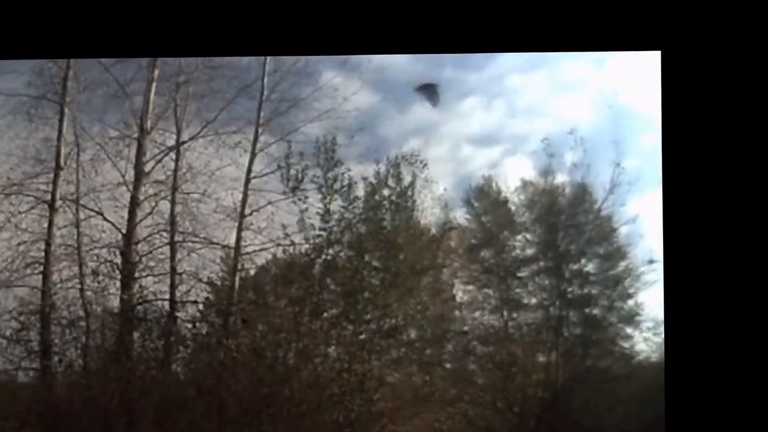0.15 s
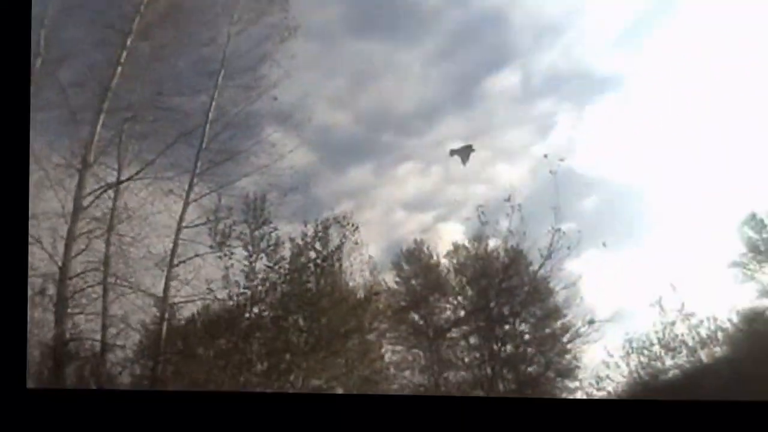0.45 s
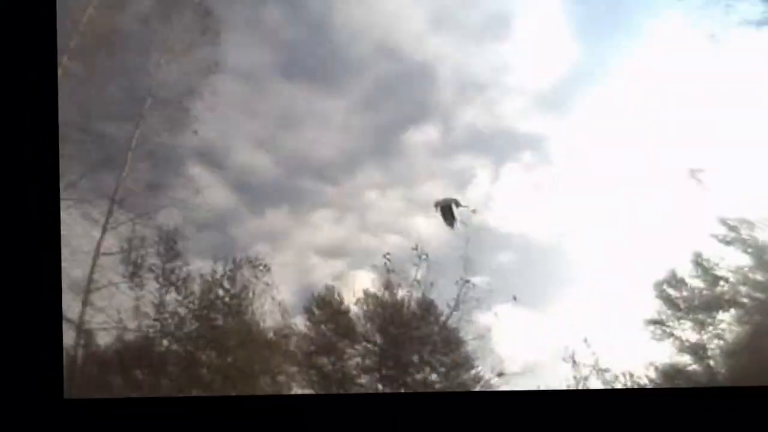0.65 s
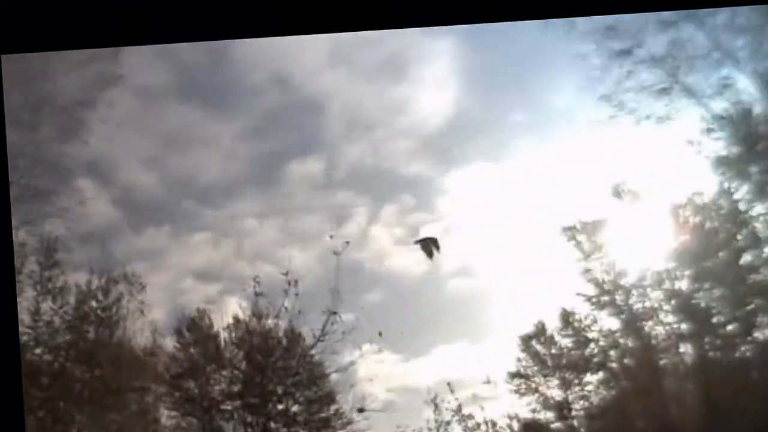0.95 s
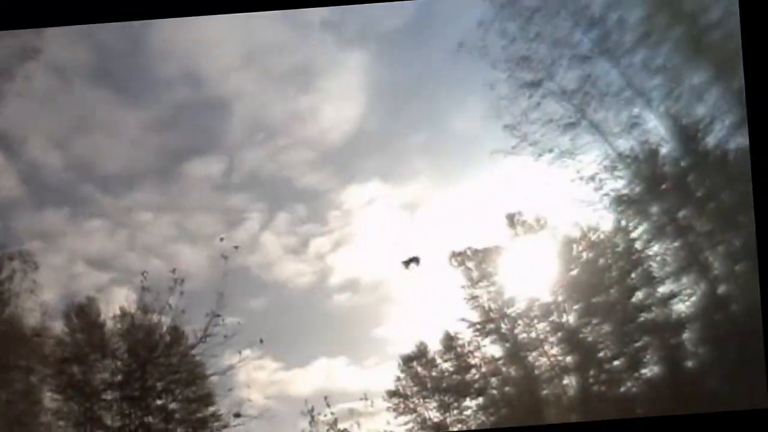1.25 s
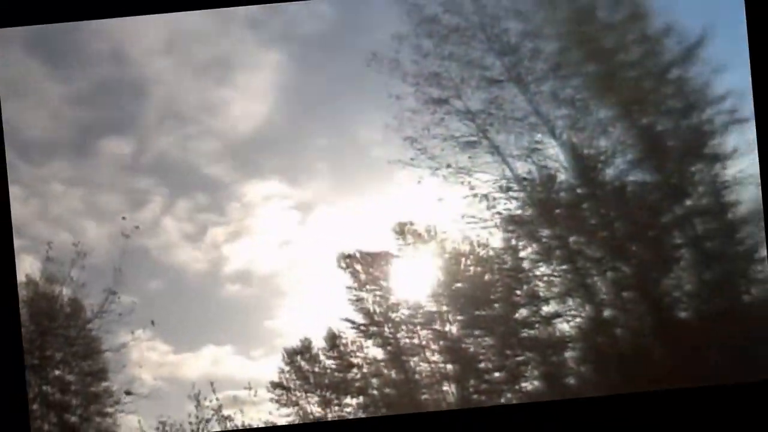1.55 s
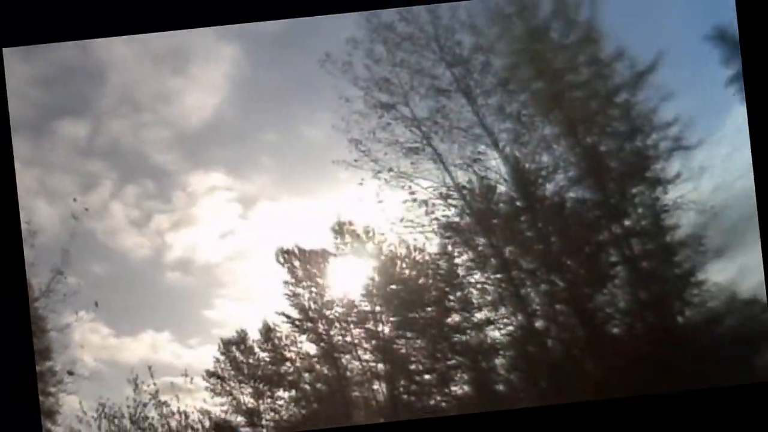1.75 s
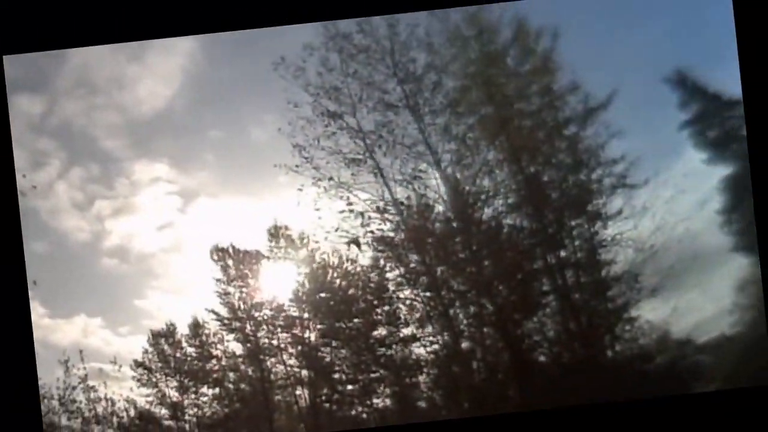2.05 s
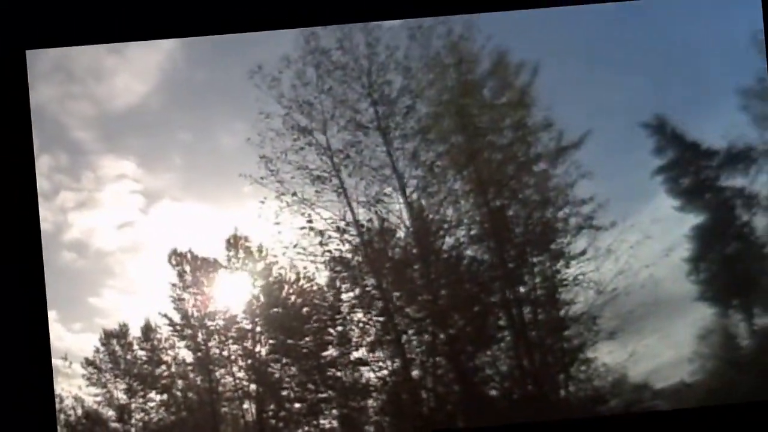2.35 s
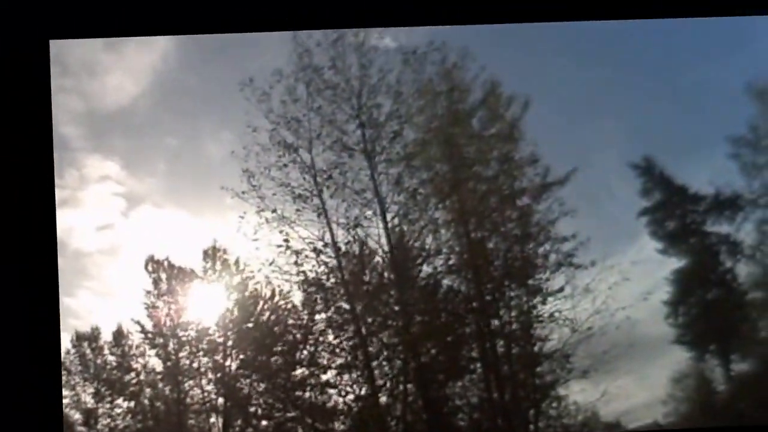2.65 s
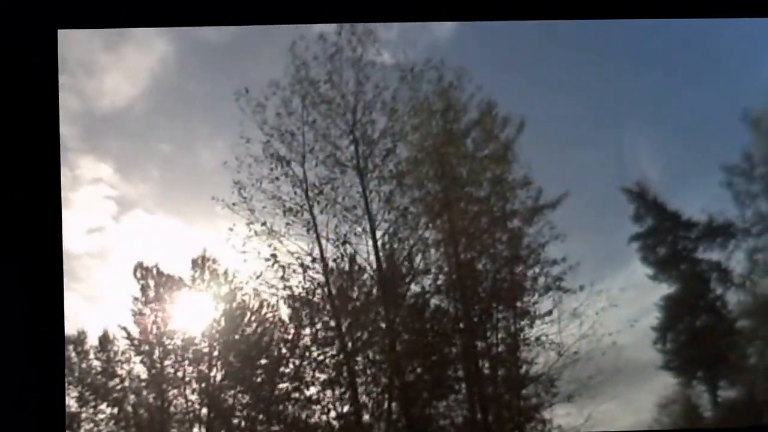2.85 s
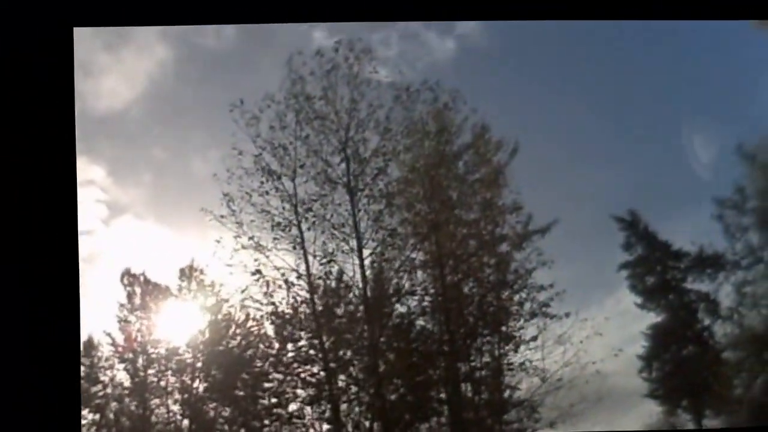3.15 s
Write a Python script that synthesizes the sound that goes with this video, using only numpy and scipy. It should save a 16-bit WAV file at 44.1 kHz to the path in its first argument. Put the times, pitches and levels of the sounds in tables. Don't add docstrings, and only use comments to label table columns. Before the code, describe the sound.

Small high-pitched pellet bells jingle densely and close from the start until about 0.8 s, then in sparser, weaker bursts, sinking slightly in pitch and fading to faint tinkles by 3.3 s as the bird flies off. Cloth rustles, plastic ticks and knocks cluster before 1.6 s; wind buffets low around 0.85 s. Distant traffic drones throughout; one soft falling hoot at 1.45 s; a dull thud at 2.1 s.

```python
import sys
import numpy as np
from scipy import signal
from scipy.fft import rfft, irfft
from scipy.io import wavfile
from scipy.ndimage import uniform_filter1d

SR = 44100
rng = np.random.default_rng(int(sys.argv[2]) if len(sys.argv) > 2 else 0)


def to_wav(s):
    ch = np.atleast_2d(s).T
    pcm = np.round(np.clip(ch, -1, 1) * 32767)
    wavfile.write(sys.argv[1], SR, pcm.astype(np.int16))


def volts_from_db(level):
    exponent = np.asarray(level, float) / 20
    return 10 ** exponent


N = 145971


def evened(x):
    return x / np.sqrt(np.mean(x ** 2) + 1e-20)


def read(points, hz):
    f, value = np.transpose(points)
    return np.interp(np.log(hz + 1), np.log(f + 1), value)


def along(points):
    return np.interp(np.arange(N) / SR, *np.transpose(points))


def add(mix, s, sound):
    part = mix[round(s * SR):][:len(sound)]
    part += sound[:len(part)]


def colour(x, spectrum, below_db=0):
    hz = np.fft.rfftfreq(len(x), 1 / SR)
    gain_db = read(spectrum, hz) + below_db * (hz < spectrum[0][0])
    return irfft(rfft(x) * volts_from_db(gain_db), len(x))


# (frequency [Hz], density [dB per Hz])
HISS_SPECTRUM = [(1500, -0.5), (3000, -3), (5000, -7.5), (6600, -11.5), (7900, -6.5), (8600, -8.5)]


def hiss():
    hiss_db = -71
    return volts_from_db(hiss_db) * evened(colour(rng.standard_normal(N), HISS_SPECTRUM, below_db=-20.5))


# (frequency [Hz], density [dB per Hz])
ROAD_SPECTRUM = [(60, -2.5), (93, -1.5), (330, -30), (951, -18), (1770, -32.5), (3000, -42), (4400, -50.5),
                 (8600, -71)]
# (time [s], level [dB])
CARS_PASSING = [
    (0, -0.56),
    (1.1, 0.75),
    (1.9, -0.74),
    (2.6, 1),
    (2.9, -0.55),
    (3.31, 2.5),
]
# (frequency [Hz], width [Hz], level [dB])
ENGINE_DRONES = [
    (90.6, 21.5, -38),
    (126.8, 32, -48),
    (205.8, 74, -52),
]


def traffic():
    road_db, patch_db, swell_db = -34, 0.54, 0.18
    frames, bins = N // 256 + 5, 513
    patches = uniform_filter1d(rng.standard_normal((frames, bins)), size=14, axis=0)
    patches = evened(uniform_filter1d(patches, size=10, axis=1))
    swell = evened(uniform_filter1d(rng.standard_normal(frames), size=40))[:, None]
    noise = rng.standard_normal((frames, bins)) + 1j * rng.standard_normal((frames, bins))
    noise = noise * volts_from_db(patch_db * patches + swell_db * swell)
    wash = signal.istft(noise.T, nperseg=1024, noverlap=768)[1][:N]
    out = volts_from_db(road_db + along(CARS_PASSING)) * evened(colour(wash, ROAD_SPECTRUM, below_db=-13))

    f = np.fft.rfftfreq(N, 1 / SR)
    for drone_hz, width_hz, db in ENGINE_DRONES:
        resonance = 1 / (1 + (2 * (f - drone_hz) / width_hz) ** 2)
        out += volts_from_db(db) * evened(irfft(rfft(rng.standard_normal(N)) * resonance, N))
    return out


# (start [s], length [s], from [Hz], to [Hz], level [dB])
FAR_HOOT = (1.44, .18, 612, 505, -47)


def hoot():
    s, length, from_hz, to_hz, db = FAR_HOOT
    out, u = np.zeros(N), np.linspace(0, 1, round(length * SR))
    tone = np.sin(2 * np.pi * np.cumsum(from_hz + (to_hz - from_hz) * u) / SR)
    add(out, s, np.sqrt(2) * volts_from_db(db) * np.sin(np.pi * u) ** .4 * tone)
    return out


# (time [s], level [dB])
GUST_LEVEL = [(0, -26), (.3, -35.5), (.6, -33.5), (.76, -25), (.86, -21.5), (1, -26.5), (1.1, -38.5),
              (1.5, -32.5), (1.8, -35), (2, -34), (2.6, -36), (3.31, -39)]
# (frequency [Hz], density [dB per Hz])
WIND_SPECTRUM = [(2.4, -37.5), (4.0, 2), (16, 7), (54, 0), (90, -12), (120, -27), (200, -120)]


def wind():
    spectrum = WIND_SPECTRUM + [(200, -33.5), (400, -83.0)]
    return volts_from_db(along(GUST_LEVEL)) * evened(colour(rng.standard_normal(N), spectrum))


# (time [s], level [dB])
HAND_MOVEMENT = [(0, -53.5), (.17, -64), (.21, -52.5), (.3, -53), (.345, -45), (.46, -49), (.57, -54.5),
                 (.66, -53), (.69, -47), (.73, -51), (.86, -57), (1.07, -56.5), (1.15, -49), (1.29, -52),
                 (1.37, -56.5), (1.44, -53), (1.53, -54.5), (1.6, -64)]
# (frequency [Hz], density [dB per Hz])
CLOTH_SPECTRUM = [(880, -35), (1500, -12.5), (1910, -12), (2670, -5.5), (3400, -6.5), (4690, -10.5),
                  (8050, -4.5), (8600, -4), (11200, -32), (18900, -120)]


def rustle():
    cloth_db, snaps_per_s, spread_db, smooth = 3, 2200, 12, 0.67
    snaps = volts_from_db(spread_db * np.minimum(rng.exponential(1, N), 3.5)) * (rng.random(N) < snaps_per_s / SR)
    grain = rng.standard_normal(60) * np.exp(-np.arange(60) / 12)
    snaps = signal.oaconvolve(snaps, grain)[:N]
    rub = smooth * rng.standard_normal(N) + (1 - smooth) * evened(snaps)
    rub = colour(rub, [(700, -38.0)] + CLOTH_SPECTRUM, below_db=-25.0)
    return volts_from_db(along(HAND_MOVEMENT) + cloth_db) * evened(rub)


# (time [s], peak level [dB], pitch [Hz])
CASING_TICKS = [(.065, -42, 5200), (.318, -36, 6900), (0.341, -27, 7150), (0.342, -34, 3000),
                (.348, -43, 4100), (.37, -45, 4300), (.463, -35.5, 4300), (.633, -33, 7600),
                (.686, -34.5, 5900), (.702, -47, 4700), (1.16, -32, 6300), (1.208, -48, 5200),
                (1.417, -41, 6400), (1.46, -46, 4100), (1.703, -49, 6800), (1.713, -51, 4600),
                (1.744, -56, 4800), (1.908, -45, 6800), (1.993, -53, 6000), (2.103, -42.5, 4830),
                (2.454, -50, 7250), (2.462, -50, 5850), (3.115, -45, 7900)]


def ticks():
    tick_db, t60_s, width_octaves = 5, .006, .5
    out, t, f = np.zeros(N), np.arange(1024) / SR, np.fft.rfftfreq(1024, 1 / SR) + 1
    for s, db, hz in CASING_TICKS:
        band = np.exp(-.5 * (np.log2(f / hz) / width_octaves) ** 2)
        body = evened(irfft(rfft(rng.standard_normal(len(t))) * band))
        add(out, s, np.minimum(t * 1000, 1) * volts_from_db(db + tick_db - 60 * t / t60_s) * body)
    return out


# (time [s], peak level [dB], pitch [Hz])
CASING_KNOCKS = [
    (0.296, -36.5, 1900),
    (0.631, -30.5, 2870),
    (0.63, -28, 1100),
    (2.103, -33.5, 300),
    (3.161, -37, 930),
]


def knocks():
    t60_s = .017
    out, t = np.zeros(N), np.arange(0, .06, 1 / SR)
    for s, db, hz in CASING_KNOCKS:
        fall_db = -60 * t * np.sqrt(hz / 1000) / t60_s
        add(out, s, volts_from_db(db + fall_db) * np.sin(2 * np.pi * hz * t))
    return out


# (time [s], loose-pellet level [dB], Doppler ratio)
FLIGHT_PATH = [
    (0, -54, 1),
    (.3, -54, 1),
    (.7, -59, .997),
    (.9, -70, .992),
    (1.2, -63, .989),
    (1.7, -66, .987),
    (2.2, -69, .985),
    (3.31, -70, .988),
]
# (frequency [Hz], level [dB], T60 [s])
SHELL_MODES = [
    (3060, -9, .04),
    (3430, -5, .07),
    (3490, -5, .07),
    (7290, -9, .1),
    (7520, -10, .08),
    (7830, -9, .08),
    (8150, -8, .08),
    (8460, -14, .05),
]


def roll():
    taps_per_s, spread_db = 260, 2.8
    s, roll_db, ratio = np.transpose(FLIGHT_PATH)
    turns, out = np.cumsum(along(np.transpose([s, ratio]))) / SR, np.zeros(N)
    for hz, db, t60 in SHELL_MODES:
        taps = volts_from_db(spread_db * np.minimum(rng.exponential(1, N), 4)) * (rng.random(N) < taps_per_s / SR)
        taps = taps * np.exp(2j * np.pi * rng.random(N))
        ring = signal.lfilter([1], [1, -np.exp(-np.log(1000) / (t60 * SR))], taps)
        out += volts_from_db(db) * evened((ring * np.exp(2j * np.pi * hz * turns)).real)
    return volts_from_db(along(np.transpose([s, roll_db]))) * out


def struck(strikes):
    s, _, ratio = np.transpose(FLIGHT_PATH)
    out = []
    for at, db, hz, ring in strikes:
        modes = np.array(SHELL_MODES)[:, 0] * np.interp(at, s, ratio)
        out.append((at, db, modes[np.argmin(abs(modes - hz))], ring))
    return out


def rings(strikes, t60, gain_db, waver_hz):
    rise_s, twin_ratio, twin_db, stop_db_per_s = .0013, 1.017, -13, -2000
    bounce_db, bounce_hz = 2, 110
    out, t = np.zeros(N), np.arange(0, .15, 1 / SR)
    b, a = signal.butter(2, bounce_hz + 2 * waver_hz, fs=SR)
    ruffle = evened(signal.lfilter(b, a, rng.standard_normal((len(strikes), 2, len(t)))))
    for (s, db, hz, length), (bounce, waver) in zip(strikes, ruffle):
        phase, twin_phase, side = rng.random(3)
        twin = twin_ratio if side < .5 else 1 / twin_ratio
        turns = np.cumsum(hz + waver_hz * waver) / SR
        tone = np.sin(2 * np.pi * (turns + phase))
        tone += volts_from_db(twin_db) * np.sin(2 * np.pi * (twin * turns + twin_phase))
        fall_db = -60 * t / t60 + stop_db_per_s * np.maximum(t - length, 0) + bounce_db * bounce
        add(out, s, np.minimum(t / rise_s, 1) * volts_from_db(db + gain_db + fall_db) * tone)
    return out


# (time [s], peak level [dB], pitch heard [Hz], ring [s])
NEAR_STRIKES = [(.003, -44, 3420, 0.038), (.036, -41, 3430, 0.029), (.064, -38, 3430, .028),
                (.097, -39, 3490, 0.046), (.152, -42, 3430, 0.021), (.168, -39.5, 3430, .03),
                (.204, -44, 3490, .03), (.243, -35, 3430, 0.018), (.268, -37, 3490, 0.021),
                (.287, -43, 3500, 0.021), (.361, -40, 3490, .012), (.372, -38.5, 3490, 0.018),
                (.394, -45, 3480, .015), (.425, -44, 3480, .03), (.47, -50, 3490, 0.037),
                (.522, -41.5, 3490, 0.024), (.568, -44.5, 3480, 0.033), (.604, -54.5, 3480, 0.014),
                (.696, -49, 3430, 0.028), (.729, -53.5, 3420, 0.026), (.786, -44, 3480, 0.028),
                (1.057, -43, 3440, 0.021), (1.074, -46, 3380, .015), (1.094, -45, 3430, 0.013),
                (1.142, -48, 3380, .015), (1.162, -54, 3380, 0.036), (1.299, -51, 3470, .01),
                (1.321, -46, 3430, .015), (1.341, -46, 3430, 0.026), (1.422, -49.5, 3380, .03)]
# (time [s], peak level [dB], pitch heard [Hz], ring [s])
FAR_STRIKES = [(1.561, -46, 3390, 0.018), (1.583, -45.5, 3390, 0.021), (1.78, -50, 3380, .025),
               (1.822, -53.5, 3370, .012), (1.85, -47.5, 3400, .025), (1.874, -47.5, 3400, 0.013),
               (1.892, -47, 3370, 0.022), (1.973, -53.5, 3350, 0.036), (2.073, -51.5, 3330, 0.022),
               (2.091, -48.5, 3370, .03), (2.138, -52, 3380, .035), (2.262, -55.5, 3380, 0.031),
               (2.35, -47.5, 3380, 0.026), (2.39, -55.5, 3380, .022), (2.636, -47.5, 3380, 0.023),
               (2.672, -52, 3380, 0.0077), (2.723, -57, 3380, .04), (2.805, -59, 3390, .02),
               (2.976, -55.5, 3440, 0.017), (3.126, -59, 3440, .03), (3.249, -50.5, 3370, .04),
               (3.28, -54, 3480, .03)]
# (time [s], peak level [dB], pitch heard [Hz], ring [s])
GLANCING_STRIKES = [(.001, -41.5, 7400, .012), (.004, -42.5, 7830, 0.024), (.064, -42.5, 8150, 0.018),
                    (.067, -52, 7290, .045), (.096, -41, 8150, 0.014), (.12, -51, 7520, .03),
                    (.149, -45, 7520, .012), (.167, -49, 7290, .035), (.217, -43, 8150, .025),
                    (.225, -46.5, 8450, 0.048), (.242, -41, 8150, .02), (.267, -40, 8150, .03),
                    (.369, -45.5, 7820, 0.0088), (.404, -40, 7830, 0.016), (.521, -45.5, 7510, 0.021),
                    (.544, -41.5, 7520, 0.018), (.686, -41.5, 8120, .012), (.787, -36.5, 8120, 0.021),
                    (.786, -46.5, 7340, 0.022), (1.077, -48, 7220, .015), (1.098, -47.5, 7200, .04),
                    (1.323, -43, 7210, .012), (1.545, -52, 8050, .024), (1.591, -44, 7740, 0.01),
                    (1.807, -55.5, 7720, .02), (1.827, -52, 7720, .022), (1.849, -56, 7750, .022),
                    (2.135, -61, 7720, .022), (2.677, -59, 7210, .035), (2.722, -52, 7310, .008),
                    (2.74, -60, 7210, .025), (2.983, -55, 8050, 0.02), (3.266, -60, 7740, .02)]
# (time [s], peak level [dB], pitch [Hz], ring [s])
HOLLOW_BLOWS = [(.001, -37, 3040, .01), (.018, -43, 2930, .012), (.034, -36, 3150, .01),
                (.072, -46, 3150, .015), (.242, -41, 3260, .01), (.266, -41, 3200, .008),
                (.463, -39, 3150, 0.0051), (.785, -41, 3380, 0.0067), (1.057, -37.5, 3290, 0.011),
                (1.063, -50, 3010, .01), (1.162, -45, 3170, .008), (1.32, -41, 3130, .01),
                (1.331, -43, 3370, 0.0085), (1.341, -42, 3135, .012), (1.86, -51, 3200, 0.013),
                (1.892, -41, 3210, 0.0065), (3.25, -48, 3280, .02)]


def bells():
    trees_db, trees_t60_s = -16, 0.43
    dry = rings(struck(NEAR_STRIKES + FAR_STRIKES), t60=.3, gain_db=-1.5, waver_hz=18)
    dry += rings(struck(GLANCING_STRIKES), t60=.2, gain_db=-1, waver_hz=36)
    dry += rings(HOLLOW_BLOWS, t60=.08, gain_db=0, waver_hz=260)
    dry += roll()
    t = np.arange(0, .6, 1 / SR)
    tail = rng.standard_normal(len(t)) * volts_from_db(-60 * t / trees_t60_s) * np.minimum(t / 0.013, 1)
    return dry + volts_from_db(trees_db) * signal.oaconvolve(dry, tail / np.linalg.norm(tail))[:N]


def scene():
    background = hiss() + traffic() + hoot()
    handling = wind() + rustle() + ticks() + knocks()
    return (background + handling + bells())[None]


def roll_off(x):
    return signal.sosfilt(signal.butter(12, 8990, fs=SR, output="sos"), x)


def record(dry):
    top_hz, drops_per_s, drop_s, edge_hz = 8200, 26, .004, 8550
    dry = dry * np.minimum(np.arange(N) / 90, 1)
    top = dry - signal.oaconvolve(dry, signal.firwin(301, top_hz, fs=SR)[None], "same")
    starts = 1. * (rng.random(N) < drops_per_s / SR)
    drops = signal.oaconvolve(starts, np.hanning(round(2 * drop_s * SR)), "same")
    edge = signal.firwin(1201, edge_hz, window=("kaiser", 9), fs=SR)[None]
    mix = signal.oaconvolve(dry - top * np.clip(2 * drops, 0, 1), edge, "same")
    return roll_off(mix)


dry = scene()
out = record(dry)
to_wav(out)
```